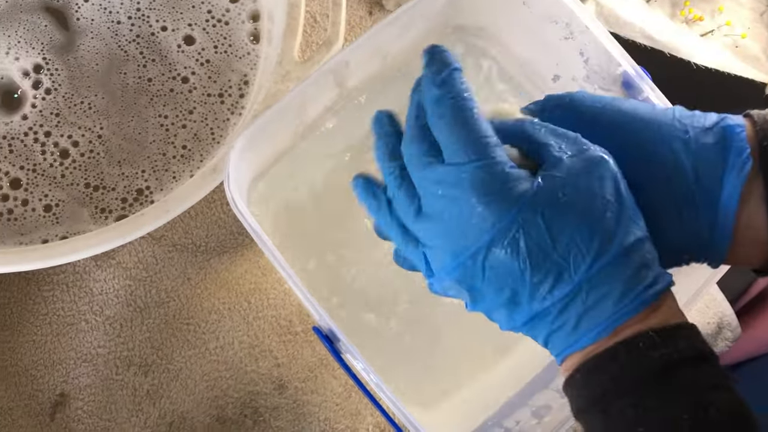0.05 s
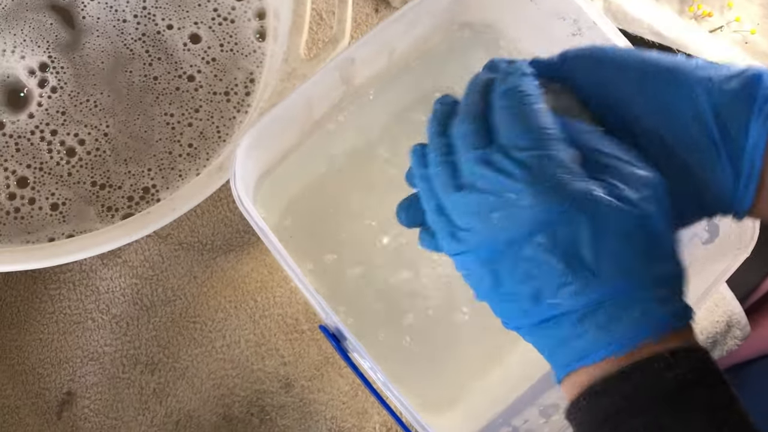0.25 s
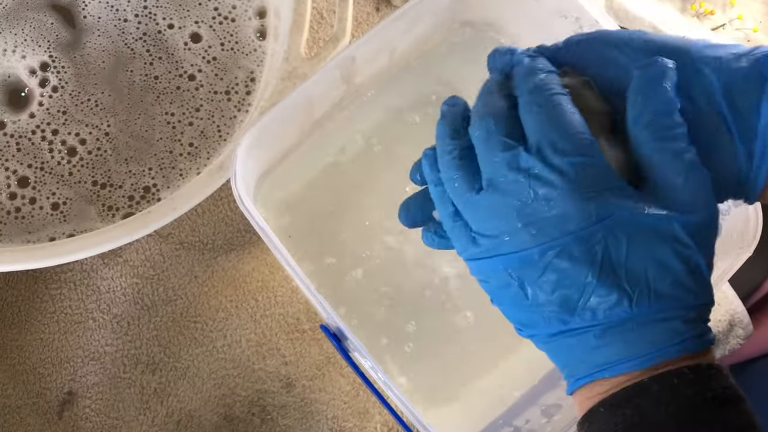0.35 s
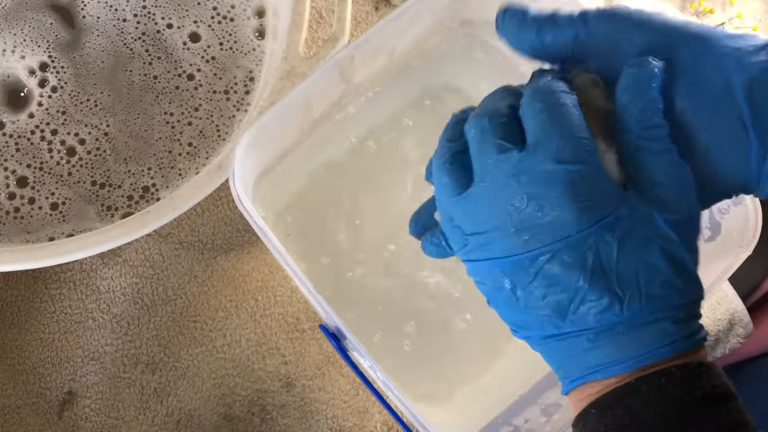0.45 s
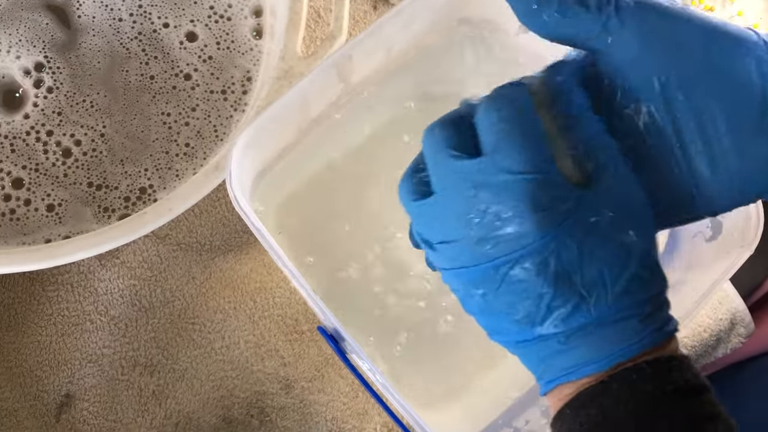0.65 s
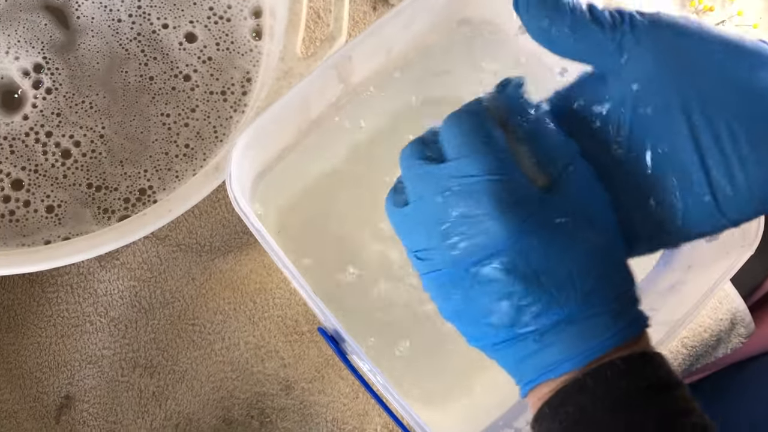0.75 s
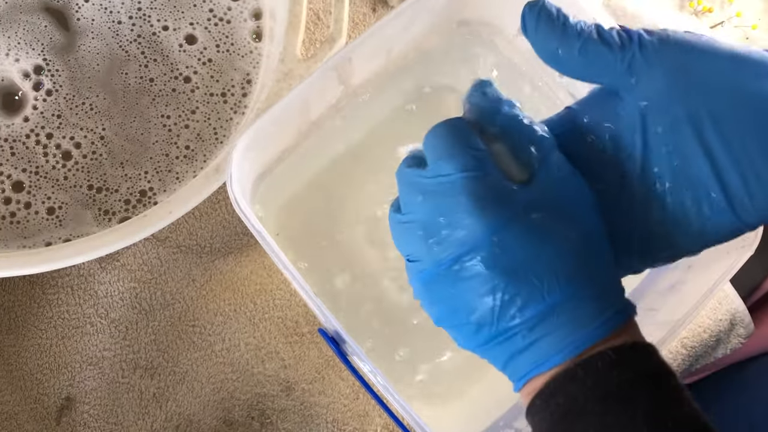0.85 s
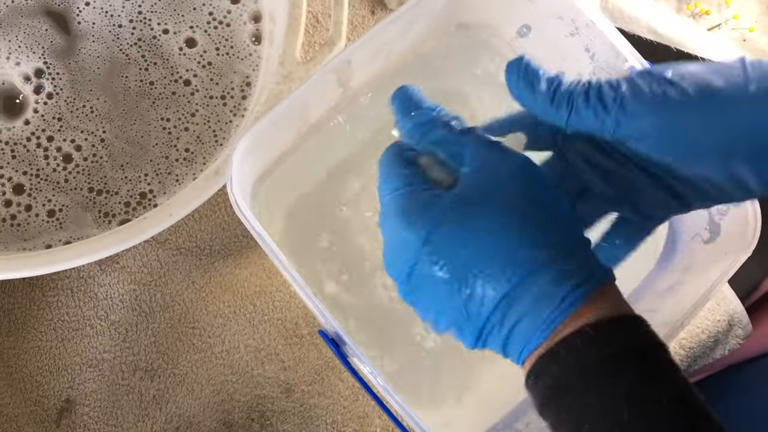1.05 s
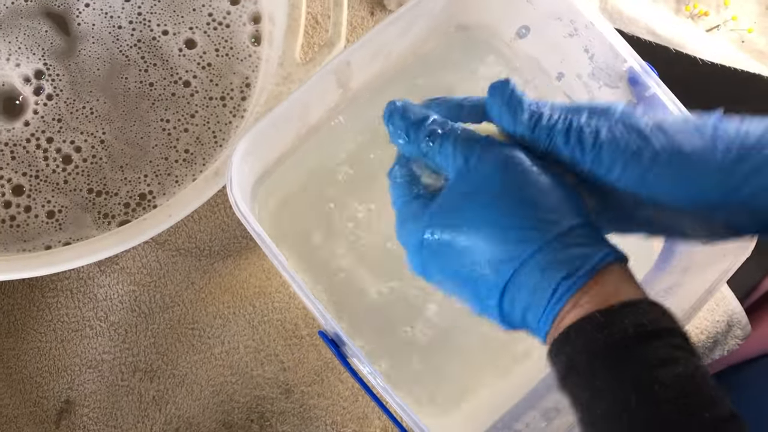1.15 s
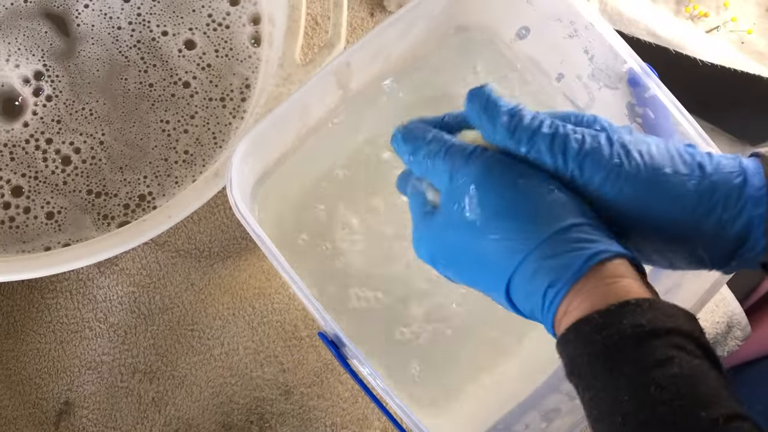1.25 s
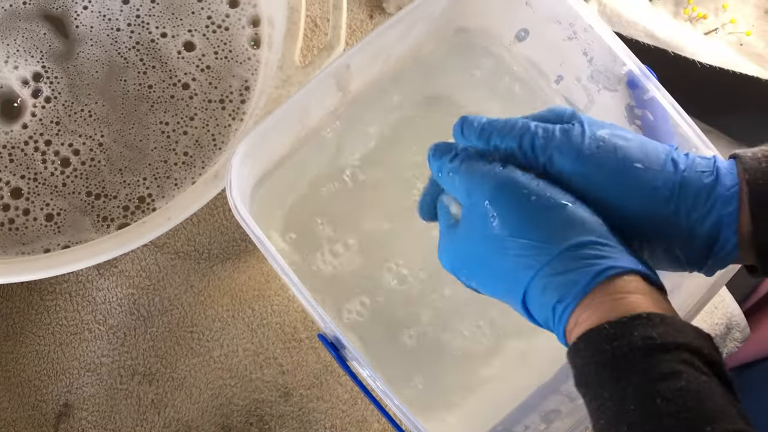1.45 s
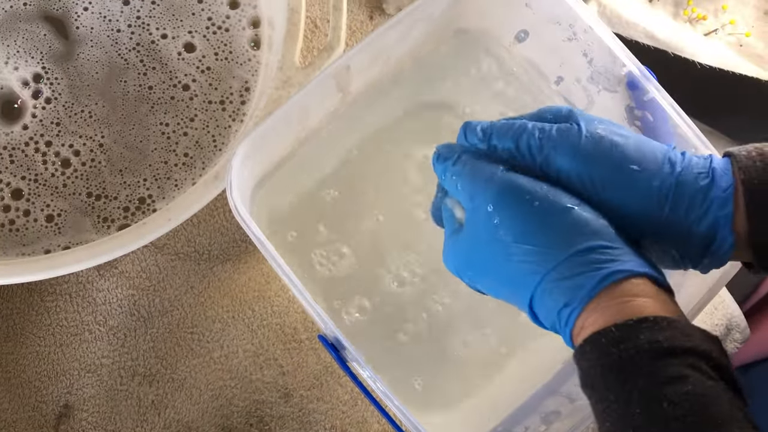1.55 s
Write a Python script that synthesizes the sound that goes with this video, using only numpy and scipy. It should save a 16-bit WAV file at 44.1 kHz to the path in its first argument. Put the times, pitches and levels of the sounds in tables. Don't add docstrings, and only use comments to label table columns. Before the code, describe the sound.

Small water splashes, drips and bubbly plinks in a plastic tub as gloved hands press soggy wool

```python
import sys
import numpy as np
from scipy import signal
from scipy.io import wavfile

SR = 44100
rng = np.random.default_rng(int(sys.argv[2]) if len(sys.argv) > 2 else 0)


def nominal_scale(level):
    x = np.asarray(level, float) / 20
    return 10 ** x


def output_pcm(signal):
    pcm = np.clip(np.atleast_2d(signal).T, -1, 1) * 32767
    wavfile.write(sys.argv[1], SR, np.round(pcm).astype(np.int16))


N = 70560


def rms_one(x):
    return x / np.sqrt(np.mean(x ** 2) + 1e-20)


def at_hz(points, hz):
    table = np.array(points)
    return np.interp(np.log(hz), np.log(table[:, 0]), table[:, 1])


def drift(rate_hz):
    r = np.exp(-2 * np.pi * rate_hz / SR)
    settle = 9000
    walk = signal.lfilter([1], [1, -2 * r, r * r], rng.standard_normal(N + settle))
    return rms_one(walk[settle:])


def band(x, low_hz, high_hz):
    edges = [low_hz, min(high_hz, SR / 2.2)]
    return signal.sosfilt(signal.butter(2, edges, "band", fs=SR, output="sos"), x)


def ring(x, hz, t60_s):
    r = nominal_scale(-60 / (t60_s * SR))
    w = 2 * np.pi * hz / SR
    return signal.lfilter([0, np.sin(w)], [1, -2 * r * np.cos(w), r * r], x + 1e-18)


def add(out, start_s, x):
    i = int(start_s * SR)
    out[i:i + len(x)] += x[:N - i]


def coloured_noise(spectrum, patchy_db):
    out = 0
    white = rng.standard_normal((2, N))
    edges = 25 * 2 ** np.arange(0, 9.6, .5)
    together = drift(16.5)
    for k, (low_hz, high_hz) in enumerate(zip(edges, edges[1:])):
        flicker_db = patchy_db * (together + drift(56.0))
        level_db = at_hz(spectrum, np.sqrt(low_hz * high_hz)) + flicker_db
        out = out + nominal_scale(level_db) * band(white[k % 2], low_hz, high_hz)
    return rms_one(out)


# frequency_hz [Hz], density_db [dB per Hz]
ROOM_SPECTRUM = [(15, -53), (25, -3), (120, 1.5), (200, 6.5), (1840, 0), (2480, 2), (4250, 6.5),
                 (14000, -9), (16000, -1.5)]


def room_tone():
    hum = rms_one(ring(rng.standard_normal(N), 123, .25))
    air = coloured_noise(ROOM_SPECTRUM, patchy_db=3.5) * nominal_scale(0.92 * drift(2.26))
    return nominal_scale(-59.5) * air + nominal_scale(-76) * hum


# frequency_hz [Hz], level_db [dB], t60_s [s]
TUB_MODES = [(1270, -84, 0.064), (1860, -20, 0.2), (2190, -9.5, 0.021), (2752, -16.5, 0.031)]


def tub(x):
    echo_t60_s, first_echo_s = 0.045, .0015
    t = np.arange(SR // 5) / SR
    tail = rng.standard_normal(len(t)) * nominal_scale(-60 * t / echo_t60_s) * (t > first_echo_s)
    echo = signal.fftconvolve(x, tail / np.sqrt(np.sum(tail ** 2)))[:N]
    modes = sum(nominal_scale(level_db) * ring(x, hz, t60_s) for hz, level_db, t60_s in TUB_MODES)
    return nominal_scale(-11) * echo + nominal_scale(-24.5) * modes


def glove_slide():
    centre_s, spread_s, level_db = .072, .012, -56
    swell = np.exp(-.5 * ((np.arange(N) / SR - centre_s) / spread_s) ** 2)
    return nominal_scale(level_db) * swell * rms_one(band(rng.standard_normal(N), 3800, 10200))


# frequency_hz [Hz], density_db [dB per Hz]
FIZZ_SPECTRUM = [(250, -6.5), (450, 10), (700, -17.5), (1800, -9), (2370, -26.5), (2700, -7.5), (5470, -6),
                 (16000, -10)]


def pops(rate_per_s, cycles, low_hz, high_hz):
    sizes = nominal_scale(4.3 * np.minimum(rng.exponential(1, N), 2.2)) * rng.choice([-1, 1], N)
    born = rng.random(N) < rate_per_s * nominal_scale(5.0 * drift(30)) / SR
    pitches_hz = np.geomspace(low_hz, high_hz, 24)
    dealt = rng.integers(0, 24, N)
    out = np.zeros(N)
    for k, hz in enumerate(pitches_hz):
        rung = ring(sizes * born * (dealt == k), hz, cycles / hz)
        out += nominal_scale(at_hz(FIZZ_SPECTRUM, hz)) * np.sqrt(hz) * band(rung, hz / 1.5, hz * 1.5)
    return rms_one(out)


# start_s [s], level_db [dB]
SQUEEZE = [(0, -61.5), (.17, -84.5), (0.361, -51), (0.431, -60.5), (0.598, -63.5), (.7, -68), (.75, -56.5),
           (.9, -52), (1.05, -46), (1.12, -61.5), (1.35, -59), (1.49, -66.5), (1.6, -91)]


def wool():
    level_db = np.interp(np.arange(N) / SR, *np.transpose(SQUEEZE))
    grains = nominal_scale(-2) * pops(700, 10.0, 2550, 15300)
    gurgles = nominal_scale(1) * pops(1400, 26.0, 907, 6180)
    hiss = nominal_scale(-9) * coloured_noise(FIZZ_SPECTRUM, patchy_db=-3.0)
    return nominal_scale(level_db) * (grains + gurgles + hiss)


# start_s [s], level_db [peak dB], centre_hz [Hz]
SNAPS = [(0.33, -33.5, 7100), (0.44, -53, 7500), (0.487, -40.5, 2960), (0.5, -37.5, 4360),
         (0.5262, -44, 5600), (0.5514, -41.5, 8000), (0.7363, -36, 11000), (0.7682, -26, 14000),
         (0.8, -39, 4600), (0.8221, -31, 12500), (0.8445, -36, 9000), (0.865, -44, 10000),
         (0.934, -30.5, 12000), (0.941, -30, 9900), (0.952, -37, 7400), (0.9945, -25, 5000),
         (1.0025, -30, 7000), (1.022, -36, 11000), (1.03, -33, 6500), (1.0485, -33, 8200),
         (1.0528, -21, 11000), (1.058, -24, 5400), (1.059, -24.5, 10900), (1.0775, -26, 13500),
         (1.109, -41, 8000), (1.113, -35, 11500), (1.123, -47, 11000), (1.14, -24, 8450),
         (1.158, -37, 11700), (1.2186, -41, 8200), (1.242, -37, 5900), (1.329, -40, 6900),
         (1.343, -41, 7000), (1.3618, -42, 5400), (1.3754, -34, 6540), (1.4506, -31.5, 8100),
         (1.585, -33.5, 4700)]


def snaps():
    t60_s, half_width = 0.0055, 2 ** 0.58
    out, t = np.zeros(N), np.arange(SR // 100) / SR
    for (start_s, level_db, hz), white in zip(SNAPS, rng.standard_normal((60, len(t)))):
        burst = ((t == 0) * 2.6 + white) * nominal_scale(-60 * t / t60_s)
        click = band(burst, hz / half_width, hz * half_width)
        add(out, start_s, nominal_scale(level_db) * click / np.abs(click).max())
    return out


# start_s [s], level_db [peak dB]
SLAPS = [(0.191, -41), (0.241, -27.5), (0.724, -25), (0.802, -51), (0.853, -29.5), (0.893, -22.5),
         (0.964, -47), (1.081, -53), (1.276, -29.5), (1.321, -42), (1.377, -33), (1.455, -53)]


def slaps():
    t60_s = 0.027
    out, t = np.zeros(N), np.arange(SR // 20) / SR
    for (start_s, level_db), white in zip(SLAPS, rng.standard_normal((20, len(t)))):
        burst = rms_one(band(white, 680, 5250))
        add(out, start_s - .001, nominal_scale(level_db - 14.5 - 60 * t / t60_s) * burst)
    return out


# start_s [s], level_db [peak dB], centre_hz [Hz]
SPLATS = [(0.002, -41, 3550), (0.2377, -25.5, 5800), (0.2933, -28, 11500), (0.309, -32, 13700),
          (0.357, -32, 8750), (0.4003, -31, 10500), (0.4614, -38, 7650), (0.6562, -36, 7400),
          (0.6705, -32, 6000), (0.6914, -40, 8100), (0.7081, -35, 6690), (0.7234, -22.5, 12100),
          (0.7345, -33, 6840), (0.7497, -41, 8500), (0.7661, -27, 13000), (0.7787, -26, 11400),
          (0.8086, -37, 6900), (0.846, -46, 8300), (0.8621, -26.5, 7200), (0.8896, -39, 6800),
          (0.9624, -31, 7640), (0.995, -48, 7540), (1.003, -29, 6000), (1.053, -37, 9500),
          (1.075, -30, 12700), (1.1328, -27, 6940), (1.3023, -32, 8800), (1.3758, -31.5, 6560),
          (1.3968, -33, 5950), (1.4548, -24, 12500)]


def splats():
    t60_s, rise_s, half_width = 0.014, .001, 2 ** 0.36
    out, t = np.zeros(N), np.arange(SR // 20) / SR
    for (start_s, level_db, hz), white in zip(SPLATS, rng.standard_normal((40, len(t)))):
        bright = rms_one(band(white, hz / half_width, hz * half_width))
        body = nominal_scale(4.5) * band(white, 1660, 11400)
        shape = nominal_scale(level_db - 11 - 60 * t / t60_s) * np.minimum(t / rise_s, 1)
        add(out, start_s, shape * (bright + body))
    return out


def chirp():
    start_s, length_s, from_hz, to_hz = .801, .014, 950, 1900
    age = np.clip((np.arange(N) / SR - start_s) / length_s, 0, 1)
    pitch_hz = from_hz + (to_hz - from_hz) * age
    shape = np.sqrt(np.abs(np.sin(np.pi * age))) * (age < 1)
    return nominal_scale(-42) * shape * np.sin(2 * np.pi * np.cumsum(pitch_hz) / SR)


def bubbles(rows, wobble_db):
    surface_share = .52
    out, t = np.zeros(N), np.arange(SR // 8) / SR
    for (start_s, level_db, hz, t60_s), white in zip(rows, rng.standard_normal((60, len(t)))):
        age = t / t60_s
        ascent = age / surface_share
        pitch_hz = hz * (1 + np.minimum(.42 * ascent ** 5, 1))
        onset = (1 - np.exp(-t * hz / .9)) ** 2
        shape = onset * nominal_scale(-60 * age - 13 * ascent ** 8)
        wobble = nominal_scale(wobble_db) * rms_one(band(white, hz / 1.142, hz * 1.334))
        tone = np.sin(2 * np.pi * np.cumsum(pitch_hz) / SR) + wobble
        pinch_decay = nominal_scale(-16 - 60 * t * np.sqrt(hz * 1500) / 9.0)
        pinch = rms_one(band(white, hz, hz * 1.35)) * pinch_decay
        add(out, start_s - 1 / hz, nominal_scale(level_db) * (shape / shape.max() * tone + pinch))
    return out


# start_s [s], level_db [peak dB], pitch_hz [Hz]
TINKS = [(0.182, -39.5, 6080), (0.194, -42.5, 5800), (0.2081, -43, 6080), (0.2405, -32.5, 2840),
         (0.2777, -37, 3710), (0.31, -39, 3570), (0.417, -41.5, 4870), (0.461, -45, 5980),
         (0.639, -38, 4240), (0.657, -35, 3310), (0.6709, -33, 5600), (0.738, -33.5, 3680),
         (0.762, -40, 5000), (0.8222, -24.5, 5540), (0.8626, -39, 3230), (0.9052, -35, 4900),
         (0.9272, -33.5, 4600), (0.9347, -34.5, 2790), (0.964, -37, 2750), (0.9735, -41, 3120),
         (1.053, -29, 3480), (1.0805, -40.5, 2790), (1.1159, -33, 2870), (1.1343, -39, 3360),
         (1.171, -38.5, 3120), (1.273, -45, 3190), (1.3114, -39.5, 5100), (1.49, -44, 5400),
         (1.5446, -43, 6900), (1.5797, -43.5, 3410), (0.7666, -38, 7840), (0.989, -44, 3060),
         (1.011, -40, 2645), (1.047, -37, 2690), (1.097, -49, 2680), (1.139, -54, 2100), (1.151, -42, 2870),
         (1.174, -44, 5030), (1.188, -51, 4100), (1.2, -47, 2920), (1.234, -53, 5200), (1.34, -47, 3000),
         (1.357, -46, 3080), (1.4151, -38, 5960), (1.463, -45.5, 3500), (1.507, -46, 4720)]


def tinks():
    return bubbles([(start_s, level_db, hz, 59 / hz) for start_s, level_db, hz in TINKS], -5.0)


# start_s [s], level_db [peak dB], pitch_hz [Hz]
PLINKS = [(0.31, -43, 2264), (0.3626, -45.5, 1846), (0.3766, -44, 1826), (0.4408, -43.5, 1866),
          (0.6311, -46.5, 1860), (0.7253, -39, 1860), (0.8101, -47, 1860), (0.8456, -45, 1860),
          (0.855, -37.5, 1870), (0.8744, -38.5, 1860), (0.8911, -44.5, 1866), (0.9404, -52, 1820),
          (1.0256, -41.5, 2240), (1.1149, -49, 1770), (1.3241, -44.5, 1900), (1.3753, -43, 1844),
          (1.4046, -44, 1850), (1.4328, -42.5, 1793), (1.5954, -39.5, 1860)]


def plinks():
    t60_s = 0.059
    return bubbles([(start_s, level_db, hz, t60_s) for start_s, level_db, hz in PLINKS], -9.0)


# start_s [s], level_db [peak dB], pitch_hz [Hz], t60_s [s]
PLOPS = [(0.21, -43, 1630, 0.039), (0.241, -40.5, 1303, 0.026), (0.271, -42, 1573, 0.05),
         (0.295, -40.5, 1270, 0.042), (0.317, -47, 1270, 0.13), (0.331, -43.5, 1270, 0.043),
         (0.362, -42, 1100, 0.059), (0.393, -49.5, 1040, 0.086), (0.63, -44, 1440, 0.04),
         (0.783, -45.5, 1710, 0.03), (0.834, -44, 1550, 0.015), (0.892, -41, 1330, 0.011),
         (0.964, -45.5, 883, 0.064), (1.082, -45, 1146, 0.071), (1.188, -46.5, 1510, 0.034),
         (1.243, -49.5, 1123, 0.028), (1.277, -40.5, 921, 0.041), (1.331, -45.5, 874, 0.066),
         (1.375, -44, 923, 0.059), (1.455, -47, 1440, 0.019), (0.854, -57, 1410, 0.03),
         (0.933, -46, 640, 0.035), (0.99, -50, 1590, 0.033), (1.003, -50, 1147, 0.11),
         (1.047, -57, 1000, 0.03), (1.082, -42, 800, 0.037), (1.107, -46, 1770, 0.013),
         (1.12, -47.5, 1230, 0.017), (1.143, -55, 590, 0.047), (1.2, -56, 1460, 0.045),
         (1.3755, -36, 1290, 0.0087), (1.512, -59, 700, 0.032)]


def plops():
    return bubbles(PLOPS, -8.0)


# start_s [s], level_db [peak dB], pitch_hz [Hz], t60_s [s]
GLUGS = [(0.403, -22, 564.7, 0.16), (0.725, -29.5, 620.5, 0.073), (0.737, -43, 640, 0.22),
         (0.781, -35.5, 576, 0.09), (0.847, -45.5, 625, 0.075), (0.866, -48, 628, 0.14),
         (0.892, -45, 606, 0.04), (0.949, -34.5, 634, 0.081), (0.993, -36, 568, 0.055),
         (1.008, -39, 550, 0.084), (1.032, -37, 595, 0.1), (1.041, -38.5, 608, 0.075),
         (1.05, -33, 564, 0.07), (1.062, -43, 570, 0.083), (1.077, -38, 601, 0.088),
         (1.094, -48.5, 846, 0.12), (1.117, -39.5, 588, 0.059), (1.188, -49, 706, 0.056)]


def glugs():
    wobble_db = -16
    pure = bubbles(GLUGS[:1], 2 * wobble_db)
    return pure + bubbles(GLUGS[1:], wobble_db) * nominal_scale(.8 * drift(45))


def scene():
    drops = splats() + slaps()
    impacts = band(drops * nominal_scale(3.5 * drift(400)), 600, 19000)
    spray = impacts + wool() + tinks()
    rings = glugs() + plops() + plinks() + chirp()
    spray = spray + snaps()
    return (rings + spray + tub(spray) + glove_slide() + room_tone())[None]


def low_pass(x):
    return signal.sosfilt(signal.butter(12, 16650, fs=SR, output="sos"), x)


def record(dry):
    x = signal.sosfilt(signal.cheby2(14, 45, 16150, fs=SR, output="sos"), dry)
    x = signal.sosfilt(signal.butter(3, 40, "high", fs=SR, output="sos"), x)
    return low_pass(x)


dry = scene()
out = record(dry)
output_pcm(out)
```